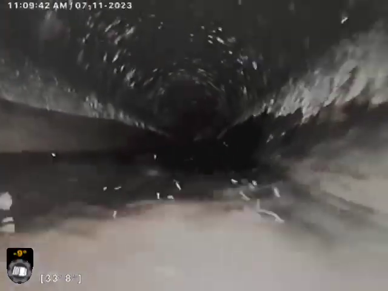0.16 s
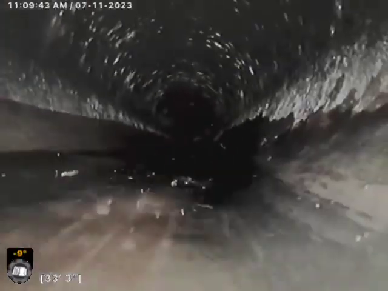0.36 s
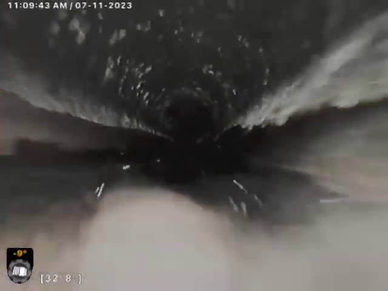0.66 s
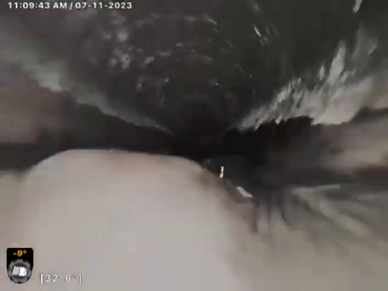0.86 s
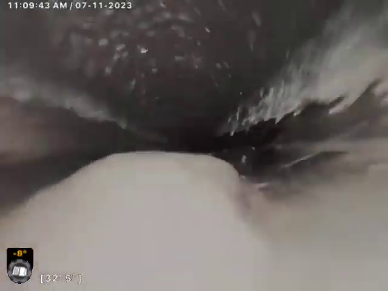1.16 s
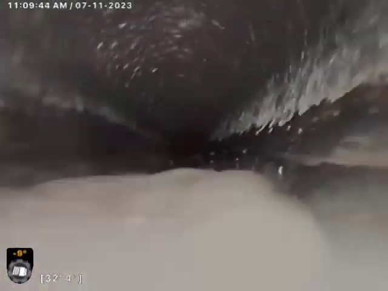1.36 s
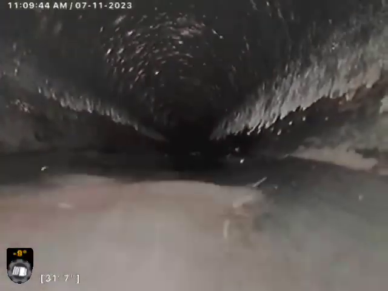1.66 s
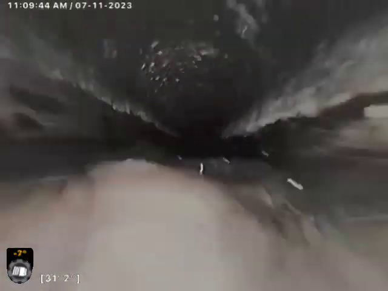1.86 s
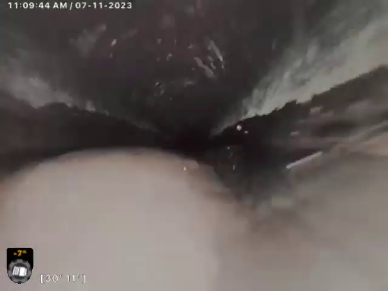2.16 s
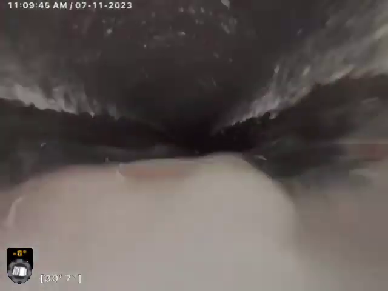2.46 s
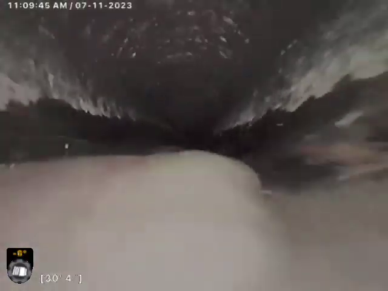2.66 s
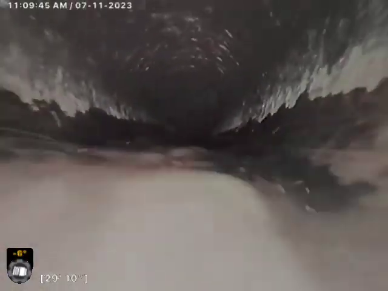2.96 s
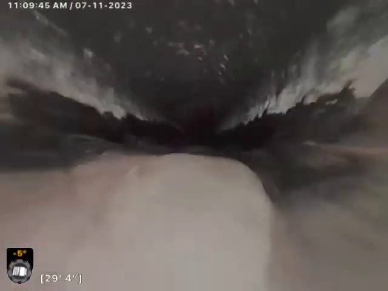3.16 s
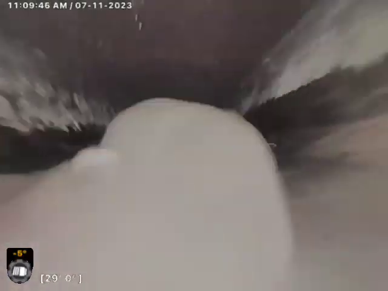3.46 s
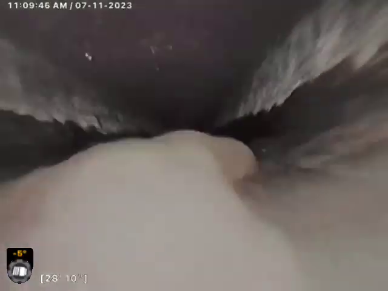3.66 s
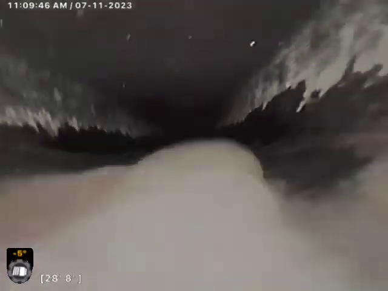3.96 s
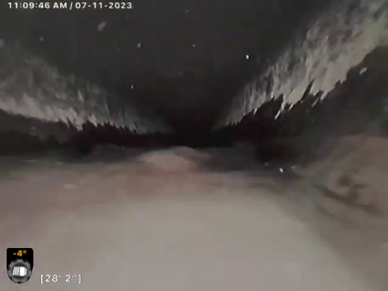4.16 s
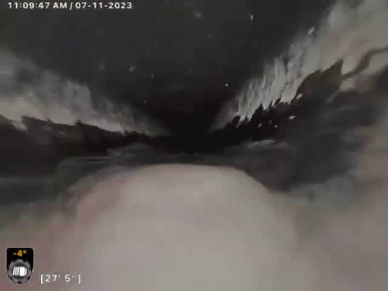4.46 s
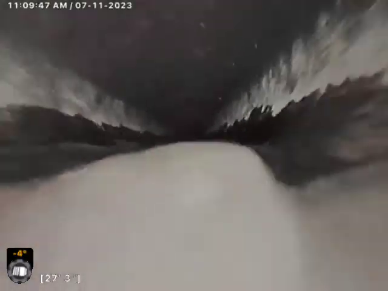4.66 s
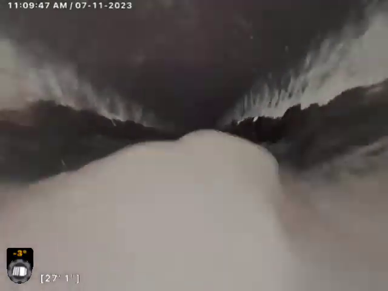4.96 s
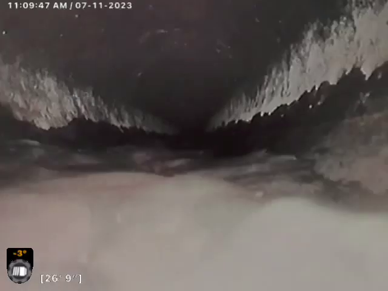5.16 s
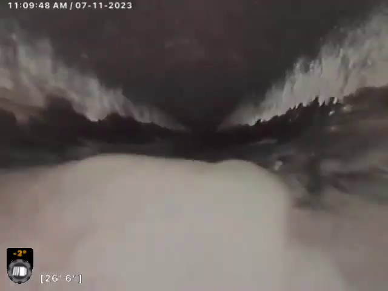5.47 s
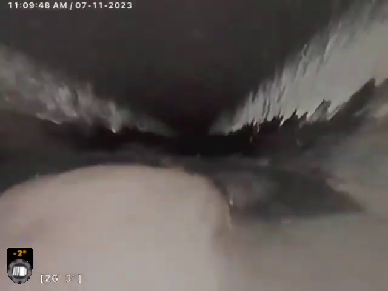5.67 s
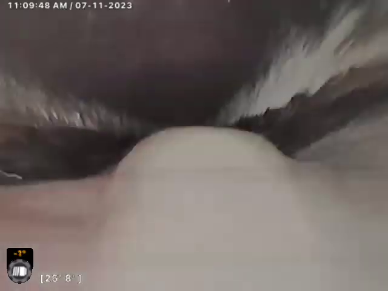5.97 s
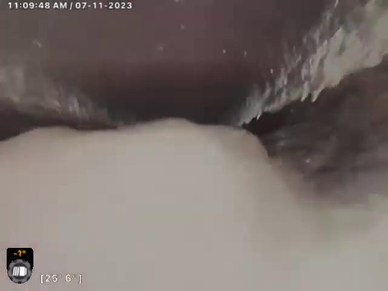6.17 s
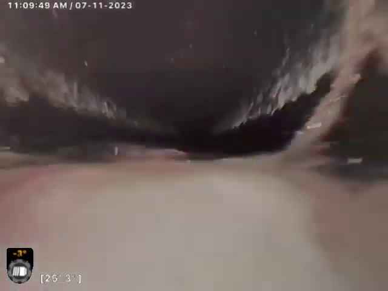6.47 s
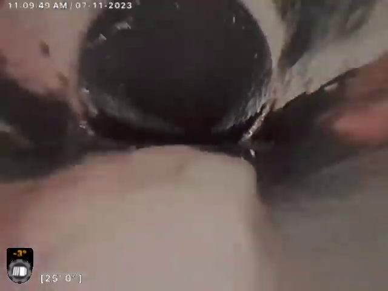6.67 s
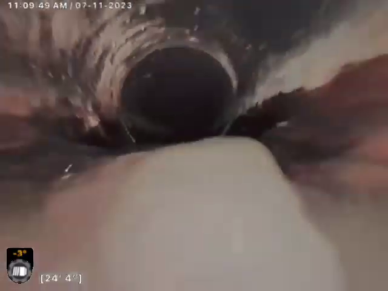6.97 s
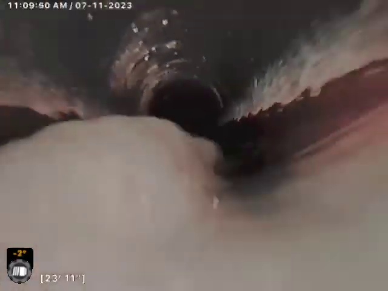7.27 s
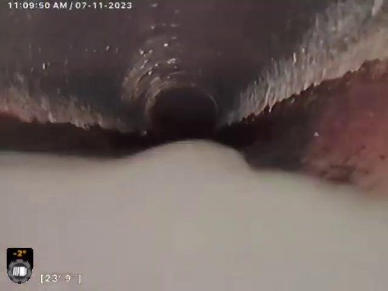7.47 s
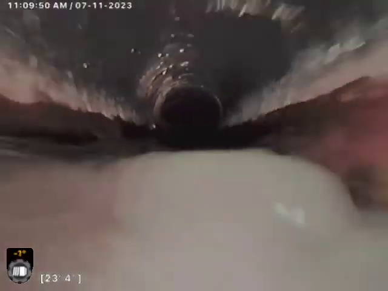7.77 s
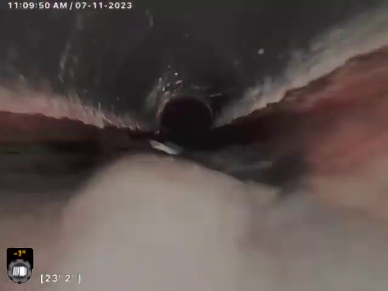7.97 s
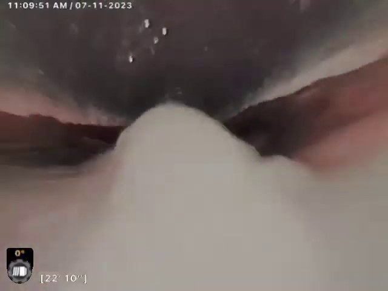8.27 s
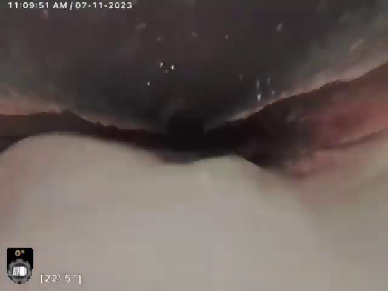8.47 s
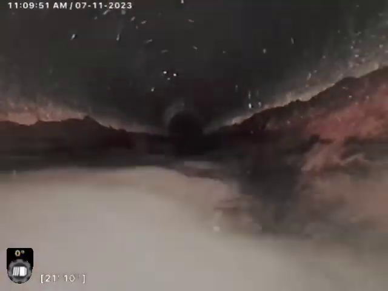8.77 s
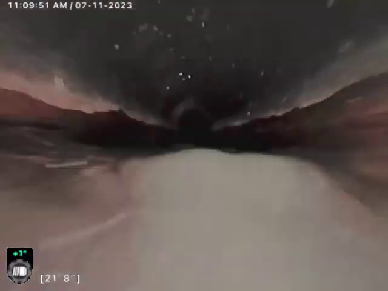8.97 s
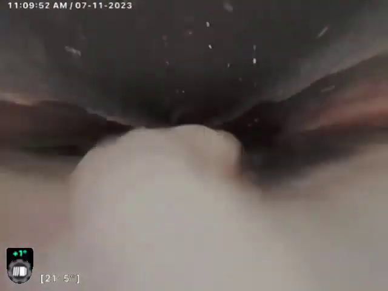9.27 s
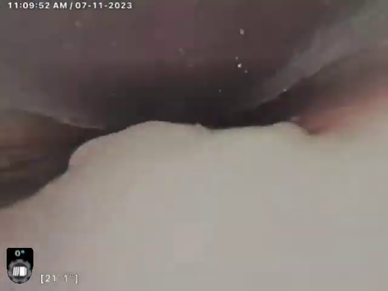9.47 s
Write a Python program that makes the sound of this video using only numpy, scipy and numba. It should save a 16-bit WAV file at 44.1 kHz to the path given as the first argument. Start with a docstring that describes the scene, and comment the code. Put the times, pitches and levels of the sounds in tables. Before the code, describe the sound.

A low, even hum and soft hiss lie under the uneven handling of a cable on a hollow plastic drum. Small clicks patter irregularly, with isolated knocks and brief gritty slides. Faint squeaking appears before the two hardest, clacking blows near the middle, which momentarily push the background down. The second half is rubbing and dull bumps, thinning to sparse ticks at the end. Everything is close and dry, with muffled treble.

```python
"""Taps, knocks and rubs on a hollow plastic drum, with faint squeaks, over a motor hum and room hiss.
A stiff camera cable is pushed back by hand into its reel, close to a small microphone.
Knocks and ticks are rattles of contact ringing the drum modes; slides shake those modes with uneven slips.
Squeaks are resonant noise and a thin falling tone, the hum wavering sines, the hiss coloured noise.
The treble is cut steeply, and a limiter ducks everything at the highest peaks and then recovers."""
import sys
import numpy as np
from scipy import signal
from scipy.fft import rfft, irfft, next_fast_len
from scipy.io import wavfile
from scipy.ndimage import uniform_filter1d, minimum_filter1d
from numba import njit

SR = 44100
rng = np.random.default_rng(int(sys.argv[2]) if len(sys.argv) > 2 else 0)


def output_pcm(signal):
    """Save a mono or channel-first signal as 16-bit PCM at the path in sys.argv[1].

    Samples are clipped to [-1, 1] before scaling.
    """
    pcm = np.clip(np.atleast_2d(signal).T, -1, 1) * 32767
    wavfile.write(sys.argv[1], SR, np.round(pcm).astype(np.int16))


def volts(x):
    """Linear amplitude factor 10**(x/20) for a level x in dB, scalar or array-like."""
    e = np.asarray(x, float) / 20
    return 10 ** e


N = 423794  # length in samples

# ringing modes of the plastic drum: f/Hz, level/dB, t60/s
DRUM_MODES = [(90.5, -9, 0.14), (161, -16.5, 0.083), (251, 1, 0.095), (274.9, -3.5, 0.13),
              (347.7, -2, 0.059), (449.2, -2.5, 0.071), (541, -10, 0.065), (667.4, -1.5, 0.035),
              (800, -1.5, 0.028), (974, 2, 0.02), (1134, 4.5, 0.014), (1320, 7, 0.01), (1662, -1, 0.016),
              (1924, -5, 0.034), (2315, -8, 0.038), (2750, 1, 0.016), (3183, 3.5, 0.0056),
              (3870, -9.5, 0.013), (4610, -11, 0.0092), (5880, -8, 0.0095), (7100, -14.5, 0.013)]
THUD_TOP_HZ = 550  # modes below this make the thud of a blow and the rumble of a slide


def to_rms(x, db):
    """Scales a signal to an rms level in dB."""
    return x * volts(db) / np.sqrt(np.mean(x ** 2))


def walk(rate):
    """Slow random wander: values held for 1 / rate s and smoothed twice; spread near 1."""
    hold = int(SR / rate)
    steps = np.repeat(rng.standard_normal(N // hold + 1), hold)
    return 1.8 * uniform_filter1d(uniform_filter1d(steps, hold), hold)[:N]


def ring(x, hz, t60):
    """One decaying mode driven by x, as a complex one-pole resonator."""
    pole = np.exp(2j * np.pi * hz / SR - np.log(1000) / (t60 * SR))
    return signal.lfilter([1], [1, -pole], x).imag


def swell(rows, rise_s, fall_s):
    """Gain that rises at each start, holds to the end of the length and dies away; rows: t/s, length/s, level/dB."""
    t = np.arange(N) / SR
    gain = 0
    for start, length, db in rows:
        rise = np.clip((t - start) / rise_s, 0, 1)
        fall = np.exp(-np.clip(t - start - length, 0, None) / fall_s)
        gain = gain + volts(db) * rise * fall
    return gain


def room():
    """Coloured hiss; every half-octave band breathes a little on its own."""
    # colour of the hiss before the overall level is set: f/Hz, density/dB per Hz
    colour = [(25, -13.5), (60, -1.5), (100, -3.5), (150, -6.5), (220, -2), (400, -13), (800, -18.5),
              (1400, -18.5), (3000, -19.5), (4500, -23.5), (6600, -25)]
    size = next_fast_len(N)
    hz, db = np.transpose(colour)
    octave = np.log2(np.fft.rfftfreq(size, 1 / SR) + 1)
    hiss = rfft(rng.standard_normal(size)) * volts(np.interp(octave, np.log2(hz), db))
    breathing = 0
    for k in range(8, 27):
        # overlapping triangles half an octave apart
        band = irfft(hiss * np.clip(1 - 2 * np.abs(octave - k / 2), 0, 1), size)[:N]
        breathing = breathing + band * volts(0.91 * walk(6))
    return to_rms(breathing, -42)


def motor():
    """A steady fundamental with weak, quickly wavering overtones, all sharing a slight drift of speed."""
    # motor hum: multiple of the fundamental, rms level/dB, waver/dB
    partials = [(1, -30, 0.35), (2, -47, 1.5), (3.5, -59, 4), (4, -51, 2.5)]
    motor_hz = 46.76
    turn = 2 * np.pi * np.cumsum(motor_hz * (1 + 0.0025 * walk(1.7))) / SR
    hum = 0
    for k, db, waver_db in partials:
        gain = np.sqrt(2) * volts(db + waver_db * walk(16))
        hum = hum + gain * np.sin(k * turn + 2 * np.pi * rng.random())
    return hum


def squeak():
    """The cable squeaks in its guide: a breathy band that flickers, and a thin whistle above it that sinks."""
    # breathy squeaks: t/s, length/s, level/dB
    squeaks = [(3.48, 0.27, -51.5), (4.18, .32, -47)]
    # thin whistle over them: t/s, length/s, level/dB
    whistles = [(3.88, 0.23, -57), (4.22, 0.074, -53.5), (4.41, .1, -54)]
    rise_s, fall_s = 0.03, 0.04
    squeak_hz = 1414
    rest_hz, start_above_hz, settle_s = 4400, 200, 0.15
    breath = rng.standard_normal(N)
    # a narrow ring on top of a weaker, wider one
    band = to_rms(ring(breath, squeak_hz, 0.034), 0) + to_rms(ring(breath, 1.08 * squeak_hz, 0.006), -10.5)
    since = np.clip(np.arange(N) / SR - whistles[0][0], 0, None)
    whistle_hz = rest_hz + start_above_hz * np.exp(-since / settle_s)
    # a fast random wander of the amplitude roughens the tone
    whistle = walk(180) * np.sin(2 * np.pi * np.cumsum(whistle_hz) / SR)
    breathy = swell(squeaks, rise_s, fall_s) * volts(0.5 * walk(30)) * band
    thin = swell(whistles, rise_s, fall_s) * volts(1.5 * walk(14)) * to_rms(whistle, 0)
    return breathy + thin


def rub():
    """Uneven slips of the sliding cable shake the drum modes, damped where the cable lies on the wall."""
    # slides along the drum wall: t/s, length/s, rumble level/dB, scrape against the rumble/dB
    slides = [(0, 0.055, -47, -15), (.5, 0.088, -50.5, -15), (1.19, 0.099, -45, -3.5),
              (1.406, 0.14, -48.5, -12), (2.413, .16, -40.5, -8.5), (2.99, 0.13, -36.5, -32),
              (3.957, 0.098, -36.5, -12), (4.132, 0.34, -48, -11), (4.556, .14, -37, -6),
              (4.874, 0.15, -41, -1), (5.07, 0.12, -35.5, -6), (5.249, 0.053, -38, -3.5),
              (5.955, .13, -41, -14), (6.216, 0.23, -41, -12), (6.513, .15, -49, -23),
              (6.92, 0.19, -35, -2.5), (7.413, 0.13, -37.5, -8.5), (7.537, 0.087, -32, -10),
              (7.861, 0.33, -42, -4)]
    rise_s, fall_s = 0.034, 0.035
    drag_db, drag_scrape_db = -47.5, -53  # faint drag that never stops
    idle = volts(0.5 * walk(8.2))
    press = swell([row[:3] for row in slides], rise_s, fall_s) + volts(drag_db) * idle
    scrapes = [(start, length, db + scrape_db) for start, length, db, scrape_db in slides]
    grit = swell(scrapes, rise_s, fall_s) + volts(drag_scrape_db) * idle
    drag = rng.standard_normal(N) * volts(2.7 * walk(22))
    rumble = 0
    for hz, db, t60 in DRUM_MODES:
        if 200 < hz < THUD_TOP_HZ:
            rumble = rumble + volts(db - 4 * np.log2(hz / 250)) * ring(drag, hz, 0.87 * t60)
    scrape = 0
    for hz, db, t60 in DRUM_MODES[5:17]:
        # each mode gets its own slips, about 400 a second
        slips = (rng.random(N) < 400 / SR) * rng.standard_normal(N) * volts(3 * walk(40))
        scrape = scrape + to_rms(ring(slips, hz, 0.63 * t60), db - 7 * np.log2(hz / 600))
    return press * to_rms(rumble, 0) + grit * to_rms(scrape, 0)


def strike(s, peak_db, thud_db, crack_db, best_hz, favour_db, ms):
    """A rattle of contacts rings the drum modes; returns the first sample and the sound."""
    split = 4  # close modes around each listed one
    lead_s = 0.025  # time from the start of the sound to the landing
    snap_db = -7  # unpitched crack of the contact, against the ring
    t = np.arange(SR // 7) / SR
    hz, db, t60 = np.repeat(DRUM_MODES, split, axis=0).T[:, :, None]
    level_luck, pitch_luck, phase_luck = rng.standard_normal((3, len(hz), 1))
    # the place of the blow favours the modes near one pitch
    db = db + favour_db * np.exp(-(np.log(hz / best_hz) / 0.33) ** 2)
    db = db + 0.76 * level_luck + np.where(hz > 1800, crack_db, 0)
    spread = np.arange(len(hz))[:, None] % split - (split - 1) / 2
    mode_hz = hz * (1 + 0.04 * spread + 0.026 * pitch_luck)
    swing = np.exp(-np.log(1000) * t / t60) * np.sin(2 * np.pi * mode_hz * t + 0.84 * phase_luck)
    # neighbouring modes swing in opposite sense, which fills the gaps between them
    swing[::2] *= -1
    # every mode needs a cycle or two to build up, so the lows come late
    swing *= volts(db) * (1 - np.exp(-(t * hz / 1.51) ** 2))

    # the cable lands with a firm first contact, then chatters out; a faint dull noise swells just before
    rattle = rng.standard_normal(SR // 16)
    since = np.arange(len(rattle)) / SR - lead_s
    shape = np.where(since < 0, 0.1 * np.exp(since / 0.006), np.exp(-since * 1000 / max(ms, 0.3)))
    contact = shape * np.where(since < 0, 3.8 * uniform_filter1d(rattle, size=20), rattle)
    contact[int(lead_s * SR) + 1] = 4.7

    low = hz[:, 0] < THUD_TOP_HZ
    body = signal.fftconvolve(swing[~low].sum(axis=0), contact)
    thud = signal.fftconvolve(swing[low].sum(axis=0), shape ** 4 * (1 + 2.8 * rattle))
    snap_band = signal.butter(2, [600, 3800], "band", fs=SR, output="sos")
    snap = signal.sosfilt(snap_band, contact * (since > 0))
    snap = np.pad(snap, (0, len(body) - len(snap))) * volts(snap_db + crack_db) / np.max(np.abs(snap))
    sound = snap + body / np.max(np.abs(body)) + volts(thud_db) * thud / np.max(np.abs(thud))
    return int((s - lead_s) * SR), volts(peak_db) * sound


def blows():
    """Knocks and light ticks of the cable on the drum wall, each a fresh strike."""
    # knocks: t/s, peak level of the body/dB, thud against it/dB, crack against it/dB, strongest ring f/Hz
    knocks = [(.395, -5.5, -3.5, -0.5, 600), (1.253, -26, 7.5, -8, 470), (1.696, -24, 1.5, -11, 475),
              (2.381, -14.5, 3.5, -6.5, 520), (2.848, -11, -1, 0, 820), (2.86, -22.5, 6.5, -9, 420),
              (3.455, -25.5, 8, -5, 313), (4.631, -21.5, -4, -3, 700), (4.641, -11, -4, -3, 710),
              (4.843, 1.5, -6.5, -8, 2750), (4.854, -5, 1.5, -2.5, 235), (4.871, -14.5, -7, 0, 1100),
              (5.091, -24, -4, -21, 770), (5.153, -24.5, -1.5, -14, 1170), (5.22, -19.5, -5.5, -4.5, 748),
              (5.245, -1, -9, -4.5, 653), (6.431, -18, 4.5, -6.5, 410), (6.843, -38, 12, -8, 260),
              (6.916, -28, 8.5, -8, 266), (7.154, -26, 2, -10, 245), (7.725, -31, 8, -21, 270),
              (8.576, -22.5, 3, -3.5, 456), (9.153, -22.5, 3, -13.5, 441)]
    # light ticks: t/s, peak level of the body/dB
    ticks = [(0.049, -21.5), (0.209, -25), (0.292, -29), (0.553, -38), (0.695, -36.5), (1.122, -32.5),
             (1.33, -25.5), (1.507, -32), (2.224, -26.5), (2.42, -23.5), (2.58, -23.5), (2.726, -24),
             (2.819, -26), (2.897, -28), (2.943, -28), (3.208, -31.5), (3.438, -28), (3.644, -30),
             (3.822, -24.5), (4.525, -28.5), (4.736, -22.5), (5.367, -33.5), (5.587, -29), (5.802, -27.5),
             (5.984, -24), (6.141, -25), (6.334, -32.5), (6.392, -31), (6.589, -32), (6.907, -27.5),
             (6.979, -30), (7.1, -29), (7.305, -31), (7.479, -27), (7.623, -27.5), (7.773, -25),
             (7.962, -27), (8.161, -31.5), (8.339, -25.5), (8.514, -31), (8.748, -27.5), (8.948, -31.5)]
    strikes = [strike(*row, favour_db=9.5, ms=4.5) for row in knocks]
    for s, db in ticks:
        strikes.append(strike(s, db, thud_db=-7.5, crack_db=-11.5, best_hz=760, favour_db=0.5, ms=1.5))
    out = np.zeros(N + SR)
    for i, sound in strikes:
        out[i:i + len(sound)] += sound
    return out[:N]


def scene():
    """All sources at the one microphone."""
    return (room() + motor() + squeak() + rub() + blows())[None]


@njit
def limiter(peak, top, hold, release):
    """Gain drops at once on a peak over the top, waits hold samples, then recovers by release per sample."""
    out, gain, wait = np.empty(len(peak)), 1., 0.
    for i in range(len(peak)):
        if peak[i] * gain > top:
            gain, wait = top / peak[i], hold
        elif wait > 0:
            wait -= 1
        else:
            gain += (1 - gain) * release
        out[i] = gain
    return out


def band_limit(x):
    """A steep low-pass at the top of the band."""
    return signal.sosfilt(signal.butter(12, 7860, fs=SR, output="sos"), x)


def record(dry):
    """A steep cut of the treble, then a peak limiter that looks 3 ms ahead."""
    narrow = signal.sosfilt(signal.ellip(10, 0.3, 75, 6783, fs=SR, output="sos"), dry[0])
    # highest peak within 3 ms either side
    ahead = -minimum_filter1d(-np.abs(narrow), size=257)
    hold_s, release_s = 0.14, 0.085
    gain = limiter(ahead, 0.96, hold_s * SR, 1 / (release_s * SR))
    # smoothing keeps the gain drop from clicking
    mix = uniform_filter1d(gain, size=129) * narrow
    return band_limit(mix[None])


dry = scene()
out = record(dry)
output_pcm(out)
```